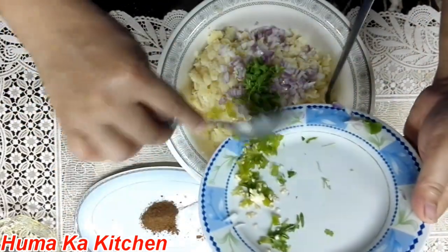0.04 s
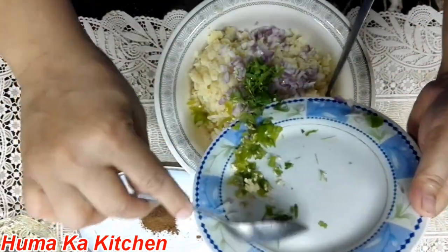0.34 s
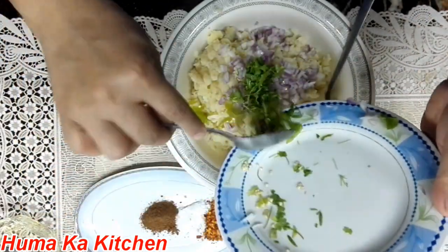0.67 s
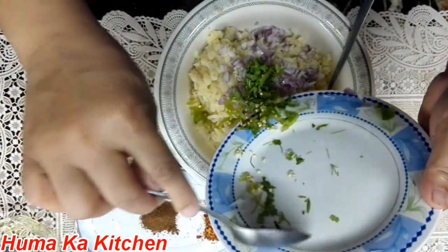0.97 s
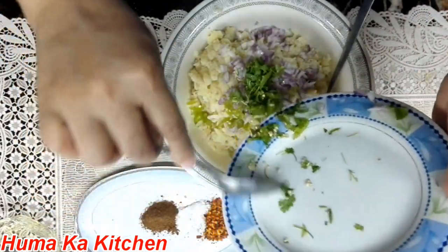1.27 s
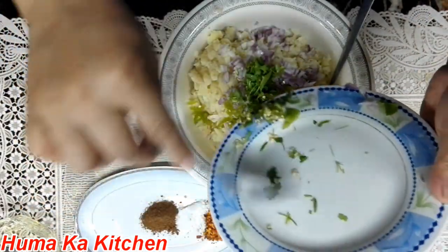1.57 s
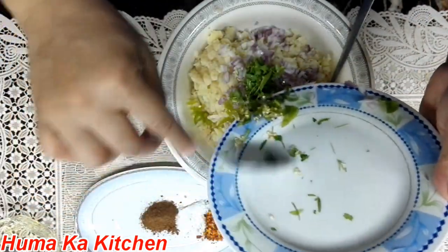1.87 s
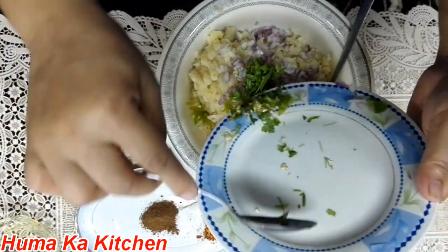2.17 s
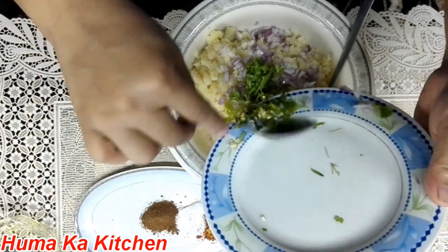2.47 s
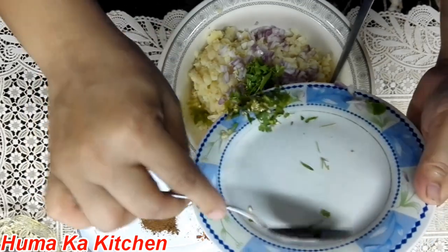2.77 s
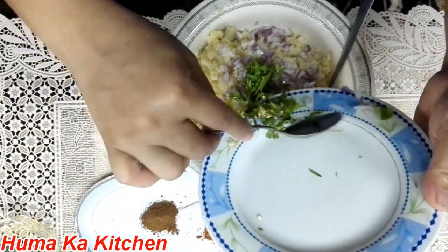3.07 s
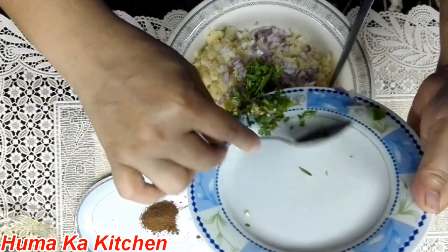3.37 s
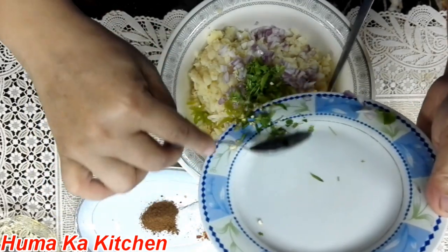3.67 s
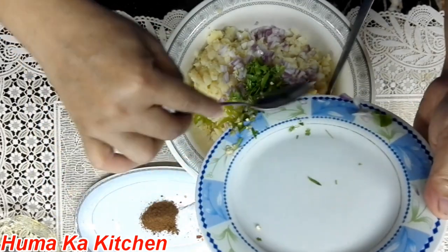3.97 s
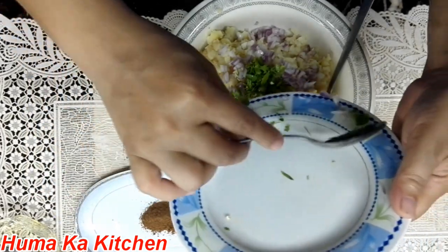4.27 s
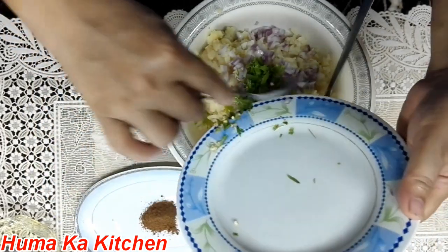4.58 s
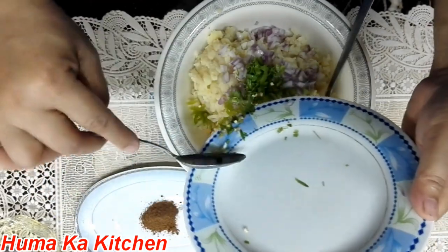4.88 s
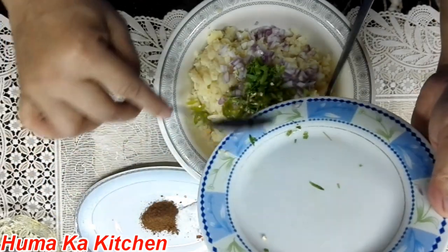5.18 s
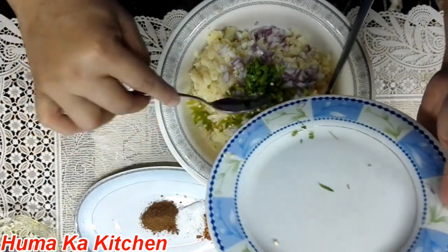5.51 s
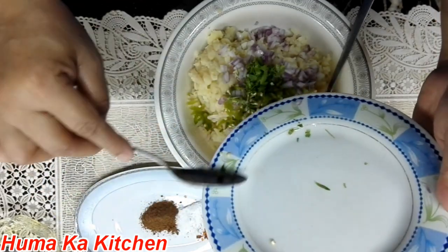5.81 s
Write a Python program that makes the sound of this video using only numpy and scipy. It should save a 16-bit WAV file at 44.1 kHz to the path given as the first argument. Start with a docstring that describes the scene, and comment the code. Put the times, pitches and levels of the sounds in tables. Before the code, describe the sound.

A metal spoon clinks and scrapes against a ceramic plate in short, slightly squeaky strokes, close by in a small kitchen.

```python
"""Short scrapes and bright clinks, close to a phone's microphone in a small kitchen: a steel spoon
is clearing chopped herbs off a hand-held ceramic plate into a bowl. Blows and stick-slip ring the
plate, which the hand damps quickly; the dragged spoon sings a short, gliding squeak, and now and
then the plate bumps the bowl. The room carries the ring on, over a low hum and a faint hiss
that comes and goes."""
import sys
import numpy as np
from scipy import signal
from scipy.fft import rfft, irfft, next_fast_len
from scipy.io import wavfile
from scipy.ndimage import uniform_filter1d

SR = 44100
rng = np.random.default_rng(int(sys.argv[2]) if len(sys.argv) > 2 else 0)


def materialize(psi):
    """Save the field psi as 16-bit PCM at rate SR to the path in sys.argv[1].

    A 1-D psi becomes a single channel; in a 2-D psi each row is a channel.
    """
    bounded = np.clip(np.atleast_2d(psi).T, -1, 1)
    quanta = np.round(bounded * 32767).astype(np.int16)
    wavfile.write(sys.argv[1], SR, quanta)


N = 262305

# Spoon blows. Each row: start in seconds, relative level in dB, chatter time in seconds,
# brightness in dB per octave, place of contact.
BLOWS = [(.068, -24.5, 0.0088, -4, "face"), (0.2164, -31, 0.00069, -10, "slope"),
         (.261, -20.5, 0.016, -8.5, "face"), (0.564, -32, 0.0015, -13.5, "face"),
         (.588, -35, 0.0029, -11, "well"), (.639, -35.5, 0.0044, -2.5, "well"),
         (.732, -31.5, 0.0014, 2, "slope"), (1.201, -19, .001, -3, "face"),
         (1.3211, -13.5, 0.0043, 1.5, "rim"), (1.449, -18.5, 0.042, 9.5, "face"),
         (1.9925, -18.5, 0.02, -8.5, "face"), (2.026, -21, 0.0018, 0, "well"),
         (2.181, -22.5, .004, 10, "ridge"), (2.239, -13, 0.0049, 2, "slope"),
         (2.5893, -14, .002, -5, "well"), (2.77, -16.5, .003, 7.5, "ridge"),
         (2.7775, -8, 0.0026, 0, "ridge"), (2.808, -9, 0.0012, 0, "rim"),
         (3.2842, -24, 0.0043, -3, "slope"), (3.3189, -20, .004, 6.5, "slope"),
         (3.3682, -12, 0.00086, 2, "rim"), (3.5885, -17.5, 0.0029, -5, "well"),
         (3.727, -20.5, 0.0034, -2.5, "slope"), (4.069, -30, 0.0023, -1, "well"),
         (4.104, -30, 0.0067, 2.5, "well"), (4.125, -35, 0.0021, 4, "face"),
         (4.174, -41, 0.0018, 13, "well"), (4.635, -19.5, 0.0012, -4, "face"),
         (5.342, -8.5, 0.0035, 0, "face"), (5.351, -10, 0.0022, -3.5, "rim"),
         (5.657, -10.5, 0.012, -6.5, "face"), (5.6924, -24, 0.001, 10, "face"),
         (5.7822, -17.5, 0.00034, -2.5, "rim")]
# Where a blow lands. Each entry: factor on the plate's decay time, weight of each mode family in dB.
PLACES = {"face": (1.34, [1.5, 3.5, -6.5, 7, 2.5, -1, 0, -4.5]),
          "well": (1.0, [-1.5, -5, 2.5, -3.5, 2, 5.5, 1, -18]),
          "slope": (0.65, [8, 3.5, 0, -4.5, -1, -0.5, 8.5, 4.5]),
          "ridge": (0.4, [-6, 0, 9.5, -18.5, -6, -3.5, 2, -1]),
          "rim": (0.56, [-4.5, -4, 3.5, -2, 3.5, -6.5, 3, 4])}
# Scraping strokes. Each row: lift-off time, length and easing-off time in seconds, relative top level,
# swell up to it and rasp against it in dB, the squeak's lower and upper peak pitch in Hz, path.
STROKES = [(0.117, 0.14, 0.028, -26.5, 6.8, -11.5, 2774, 5050, "flat"),
           (.853, 0.2, .023, -23.5, 17.6, -17.5, 2750, 3920, "flat"),
           (1.665, 0.35, .06, -24.5, 15.2, -15, 2940, 3930, "rim"),
           (2.24, 0.23, .02, -26.5, 8.4, -13.5, 3015, 4083, "flat"),
           (2.778, 0.16, .04, -21.5, 10.8, -11.5, 3030, 4104, "flat"),
           (3.322, .094, .01, -30.5, 11, -22, 2620, 3430, "flat"),
           (3.812, .073, .01, -20.5, 4.4, -10.5, 2940, 4280, "rim"),
           (4.858, 0.22, .055, -13.5, 16.2, -13, 3170, 4530, "rim")]
# Paths of the dragged edge. Each entry: hollow tone in dB, squeak in dB, mode family weights in dB.
PATHS = {"flat": (-34, 4.3, [-10.5, 0, 4.5, -1.5, 0.5, 0.5, 9, -13]),
         "rim": (-13, -7, [-1, 9.5, -0.5, 6, 1, 5, 7.5, -13])}
# The plate's modes. Each row: frequency in Hz, relative energy in dB, base t60 in seconds.
PLATE_MODES = [(1851, -23, 0.14), (2165, -16, 0.11), (2500, -14.5, 0.0083), (3019, -9, .12),
               (3175, -17.5, 0.076), (3492, -1, 0.07), (3793, -4.5, 0.017), (4530, -12, 0.13),
               (4510, -5.5, 0.025), (4356, -3, 0.033), (4780, -4.5, 0.06), (5060, -16, 0.022),
               (5632, -13, 0.082), (6240, -14.5, 0.049), (6300, -11.5, 0.091), (5947, -27.5, 0.09),
               (8140, -53.5, .02), (10040, -27, 0.027), (10090, -47, 0.021), (10750, -50, 0.026),
               (12100, -37.5, 0.033), (11600, -49, .03), (12900, -56.5, .04)]
# Centres of the plate's mode families in Hz.
FAMILY_HZ = [2200, 3030, 3550, 4480, 4830, 5650, 6300, 8500]
# Low modes that make a stroke hollow. Each row: frequency in Hz, relative energy in dB, t60 in seconds.
HOLLOW_MODES = [(1037, -11, .04), (1330, -5.5, .04), (1520, -3.5, .025), (1803, -3, 0.051),
                (1926, 3.5, .03)]
# The broad crack of steel on glaze. Each row: frequency in Hz, relative density in dB.
CRACK_SPECTRUM = [(300, -49.5), (700, -2.5), (1200, -3), (1700, 0.5), (2600, -11.5), (4000, 15),
                  (5000, 9.5), (6400, 3), (7200, -12.5), (9000, -20), (12000, -30.5), (14000, -36.5),
                  (15800, -47)]
# The fine rasp of the glaze. Each row: frequency in Hz, relative density in dB.
RASP_SPECTRUM = [(5000, -41.5), (6800, 2), (7400, -5), (8100, 0), (8900, -7.5), (9700, 4.5), (10300, -2.5),
                 (10700, -10), (11400, 1), (12000, -16.5), (12500, -2.5), (13400, -15.5), (15800, -18)]
# The plate's rim bumps the bowl. Each row: start in seconds, relative level in dB.
KNOCKS = [(1.997, -29), (2.241, -40.5), (2.809, -36), (3.37, -50.5), (5.345, -45), (5.660, -28.5)]
# The note of that bump. Each row: frequency in Hz, relative level in dB, t60 in seconds.
KNOCK_MODES = [(680, -8, 0.066), (788, -0.5, 0.081), (970, 0, 0.058), (1130, -9, .04), (1420, 0, 0.033)]
# The kitchen's rumble. Each row: frequency in Hz, relative density in dB.
RUMBLE_SPECTRUM = [(20, -26.5), (30, -16.5), (48, -5.5), (75, -19.5), (110, -4), (150, -2), (210, -1),
                   (300, -5), (450, -12.5), (700, -17), (1100, -27.5), (1800, -41.5), (3000, -75.5)]
# Hum lines. Each row: centre frequency in Hz, mean level in dB.
HUM_LINES = [(149, -47), (199, -47.5), (361, -56)]
# The faint hiss. Each row: frequency in Hz, relative density in dB.
HISS_SPECTRUM = [(60, -33), (300, 11), (600, 8.5), (1100, 4.5), (2000, -4.5), (3500, -6), (5000, -17.5),
                 (7000, -34.5)]
# How the hiss comes and goes. Each row: time in seconds, level in dB.
HISS_LEVELS = [(0, -44.5), (.45, -50.5), (.8, -54), (1.15, -43.5), (1.87, -56.5), (2.1, -56.5), (2.5, -44),
               (2.9, -53), (3.15, -41), (4.05, -47.5), (4.6, -38), (5.95, -45)]
# The phone microphone's treble response. Each row: frequency in Hz, gain in dB.
MIC_RESPONSE = [(4000, -1.5), (6400, 1.5), (7300, -4), (9000, -7.5), (9800, 1.5), (11600, -2),
                (12700, -8.5), (13600, -10.5), (15800, -22.5)]
# The phone's noise suppressor. Each row: frequency in Hz, threshold in dB per bin.
SUPPRESSOR_THRESHOLDS = [(800, -110), (1500, -85.5), (3000, -66), (7000, -84.5), (12000, -83.5),
                         (15000, -88)]

HIT_GAIN = np.sqrt(SR / 100)  # gives a hit of unit energy the energy of 10 ms at an rms of one


def clinks(ring=0.69, bite_s=0.0006, bounces_per_s=4000, crack_t60=0.023, crack_db=-7, shimmer_db=-23,
           trim_db=-0.7):
    """Each blow is a quick rattle of steel on glaze that cracks and sets the plate ringing."""
    out, t = np.zeros(N), np.arange(SR // 6) / SR
    bite = 1 - np.exp(-t / bite_s)
    for start, db, chatter_s, brightness, place in BLOWS:
        freedom, weights = PLACES[place]
        push = contacts(len(t), bounces_per_s, spread_db=0) * bite * np.exp(-t / chatter_s)
        fade = bite * undb(-60 * t / (crack_t60 + 4 * chatter_s))
        crack = unit(colour(rng.standard_normal(len(t)) * fade, CRACK_SPECTRUM))
        shimmer = unit(colour(rng.standard_normal(len(t)) * fade, RASP_SPECTRUM))
        blow = plate(push, ring * freedom) + undb(crack_db) * crack + undb(shimmer_db) * shimmer
        add(out, start, undb(db + trim_db) * HIT_GAIN * at_place(blow, weights, brightness))
    return out


def scrapes(slips_per_s=1800, ring=0.6, grit_db=-5, judder_db=3.5, ease_db_per_s=101.5, lift_s=0.003,
            rasp_lag_db=6.5, trim_db=-1):
    """The spoon's edge sticks and slips over the glaze, ringing plate and spoon more as it speeds up."""
    out, age = np.zeros(N), np.arange(SR // 2) / SR
    for end, length, easing, db, swell_db, rasp_db, lower_hz, upper_hz, path in STROKES:
        hollow_db, squeak_db, weights = PATHS[path]
        start, fastest = end - length, end - easing
        t = max(start, 0) + age
        speed = np.clip((t - start) / (fastest - start), 0, 1) ** 1.2
        eased_db = ease_db_per_s * np.maximum(t - fastest, 0)
        touch = np.exp(-np.maximum(t - end, 0) / lift_s)
        force = undb(db + trim_db - swell_db * (1 - speed) - eased_db) * touch
        # the rasp starts weaker and catches up
        rasp_force = force * undb(rasp_db - rasp_lag_db * (1.5 - speed))
        grain = contacts(len(t), slips_per_s, spread_db=3.0) + 0.025 * rng.standard_normal(len(t))
        grain *= undb(judder_db * wander(220)[:len(t)])  # slips bunch as the handle judders
        push = force * grain
        body = plate(push, ring) + undb(grit_db) * unit(colour(push, CRACK_SPECTRUM))
        hollow = unit(sum(undb(share) * unit(mode(push, hz, t60)) for hz, share, t60 in HOLLOW_MODES))
        singing = squeak(push, end - t, lower_hz, upper_hz)
        ringing = unit(at_place(body, weights) + undb(hollow_db) * hollow + undb(squeak_db) * singing)
        rasp = unit(colour(rasp_force * grain, RASP_SPECTRUM))
        add(out, start, ringing * np.linalg.norm(force) + rasp * np.linalg.norm(rasp_force))
    return out


def plate(push, ring, detune=0.0014):
    """The plate's modes, each detuned a little by the touching spoon; ring scales their decay time."""
    shifts = 1 + detune * rng.standard_normal(len(PLATE_MODES))
    # neighbouring modes swing in opposite directions
    return unit(sum((-1) ** k * undb(db) * unit(mode(push, hz * shifts[k], t60 * ring))
                    for k, (hz, db, t60) in enumerate(PLATE_MODES)))


def at_place(x, weights, brightness=0):
    """The place of contact favours some mode families; a harder contact tilts them to the treble."""
    octaves = np.log2(np.divide(FAMILY_HZ, FAMILY_HZ[0]))
    return unit(colour(x, list(zip(FAMILY_HZ, weights + brightness * octaves))))


def squeak(push, left_s, lower_hz, upper_hz, upper_db=6.0, t60=0.04, wobble=0.008, catch_db=3.5,
           climb_oct_per_s=0.72, sag_oct_per_s=5.1, sag_s=0.043):
    """Two damped spoon resonances climb as the contact point slides, then sag just before lift-off."""
    climb = -climb_oct_per_s * np.maximum(left_s - sag_s, 0)
    sag = -sag_oct_per_s * np.clip(sag_s - left_s, 0, sag_s)
    decay = undb(-60 / (t60 * SR))
    out = 0
    for hz, gain in (lower_hz, 1), (upper_hz, undb(upper_db)):
        pitch_hz = hz * 2 ** (climb + sag) * (1 + wobble * wander(110)[:len(push)])
        phasor = np.exp(2j * np.pi * np.cumsum(pitch_hz) / SR)
        resonance = (phasor * signal.lfilter([1], [1, -decay], push / phasor)).imag
        catch = undb(catch_db * wander(140)[:len(push)])  # catching and letting go keeps it rough
        out = out + gain * unit(catch * resonance)
    return unit(out)


def bowl_knocks():
    """The pressed plate bumps the bowl with a short, hollow note."""
    out, t = np.zeros(N), np.arange(SR // 6) / SR
    note = unit(sum(undb(db - 60 * t / t60) * np.sin(2 * np.pi * hz * t) for hz, db, t60 in KNOCK_MODES))
    for start, db in KNOCKS:
        add(out, start, undb(db) * HIT_GAIN * note)
    return out


def kitchen_reverb(x, t60=0.42, treble_t60=0.27, split_hz=5500, build_s=0.0035, tail_db=-9,
                   early_t60=0.033, early_db=-13):
    """Quick reflections off bowl and table, then a small hard room's tail, whose treble dies first."""
    t = np.arange(int(0.7 * SR)) / SR
    echoes = rng.standard_normal(len(t)) * (1 - np.exp(-t / build_s))
    low = signal.sosfiltfilt(signal.butter(4, split_hz, fs=SR, output="sos"), echoes)
    tail = low * undb(-60 * t / t60) + (echoes - low) * undb(-60 * t / treble_t60)
    early = rng.standard_normal(len(t)) * undb(-60 * t / early_t60) * (t > 0.002)
    return signal.fftconvolve(x, undb(tail_db) * unit(tail) + undb(early_db) * unit(early))[:N]


def room_tone(rumble_db=-39.5, waver_db=4.0, drift_hz=2.465, flicker_db=2.7):
    """Behind the plate: a low rumble, wavering hum lines and a hiss that comes and goes."""
    rumble = noise(RUMBLE_SPECTRUM) * undb(rumble_db + 0.23 * wander(2.1))
    hum = 0
    for hz, db in HUM_LINES:
        amplitude = np.sqrt(2) * undb(db + waver_db * wander(9.8))
        pitch_hz = hz + drift_hz * wander(14)
        hum = hum + amplitude * np.sin(2 * np.pi * np.cumsum(pitch_hz) / SR)
    hiss_db = np.interp(np.arange(N) / SR, *np.transpose(HISS_LEVELS))
    hiss = noise(HISS_SPECTRUM) * undb(hiss_db + flicker_db * wander(20.84))
    return rumble + hum + hiss


def noise_suppressor(x, size=512):
    """The phone turns down bands that fall under its threshold."""
    hz, _, bins = signal.stft(x, SR, nperseg=size)
    power = uniform_filter1d(np.abs(bins) ** 2, size=5, axis=-2)
    threshold = undb(db_at(hz, SUPPRESSOR_THRESHOLDS))[:, None] ** 2
    gain = power / (power + threshold)
    return signal.istft(bins * gain, SR, nperseg=size)[1][:, :N]


def contacts(samples, per_s, spread_db):
    """Tiny contacts at random moments, their sizes scattered by spread_db."""
    hit = rng.random(samples) < per_s / SR
    size = undb(spread_db * np.clip(rng.standard_normal(samples), -2, 2))
    return hit * size * rng.choice([-1, 1], samples)


def mode(push, hz, t60):
    """One decaying resonance."""
    pole = np.exp((2j * np.pi * hz - np.log(1000) / t60) / SR)
    return signal.lfilter([1], [1, -pole], push).imag


def noise(spectrum):
    """Coloured noise with an rms of one."""
    return unit(colour(rng.standard_normal(N), spectrum)) * np.sqrt(N)


def wander(rate_hz):
    """A smooth random wander with a spread near one."""
    hold = int(SR / rate_hz)
    steps = np.repeat(rng.standard_normal(N // hold + 1), hold)
    return 1.3 * uniform_filter1d(uniform_filter1d(steps, hold), hold)[:N]


def colour(x, spectrum):
    """Minimum-phase filter with a given spectrum."""
    size = 2 * next_fast_len(len(x) // 2 + 1024)
    db = db_at(np.arange(size // 2 + 1) * SR / size, spectrum)
    cepstrum = irfft(np.log(undb(db)), size)[:size // 2]
    cepstrum[1:] *= 2
    return irfft(rfft(x, size) * np.exp(rfft(cepstrum, size)), size)[:len(x)]


def db_at(hz, spectrum):
    """Read a spectrum on a log-frequency axis."""
    points_hz, db = np.transpose(spectrum)
    return np.interp(np.log(np.maximum(hz, 1)), np.log(points_hz), db)


def add(out, start_s, x):
    """Mix x in from a start time."""
    i = max(int(start_s * SR), 0)
    out[i:i + len(x)] += x[:N - i]


def undb(db):
    """Decibels to gain."""
    return 10 ** (np.asarray(db) / 20)


def unit(x):
    """Scale to an energy of one."""
    return x / np.sqrt(np.sum(x ** 2) + 1e-18)


def scene():
    """Spoon, plate and bowl up close, the kitchen around them, in mono."""
    close = clinks() + scrapes() + bowl_knocks()
    return (close + kitchen_reverb(close) + room_tone())[None]


def record(dry):
    """The phone colours the treble, mutes what is faint, clips at full scale and cuts the top."""
    at_mic = colour(dry[0], MIC_RESPONSE)[None]
    clipped = np.clip(noise_suppressor(at_mic), -1, 1)
    lowpass = signal.ellip(10, 0.2, 90, 15800, fs=SR, output="sos")
    return signal.sosfilt(lowpass, clipped)


dry = scene()
out = record(dry)
materialize(out)
```